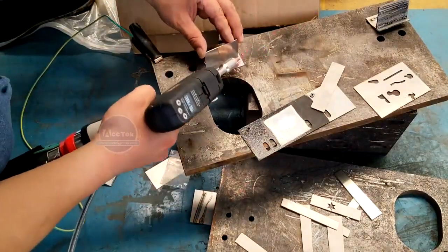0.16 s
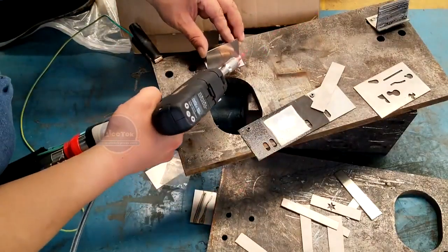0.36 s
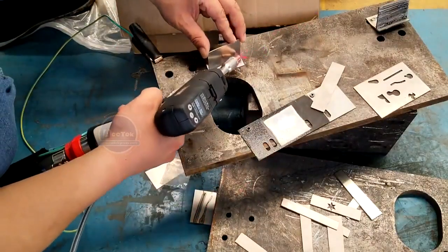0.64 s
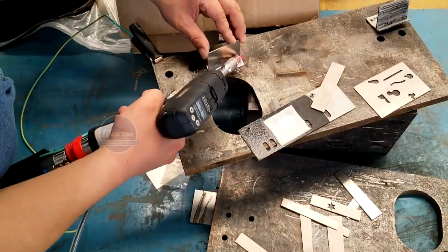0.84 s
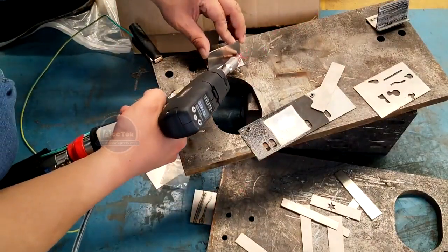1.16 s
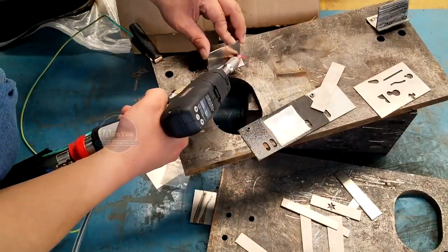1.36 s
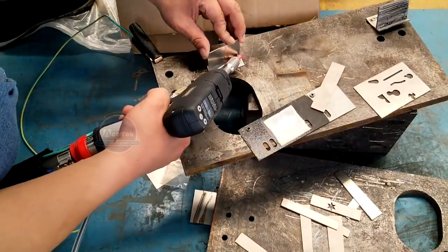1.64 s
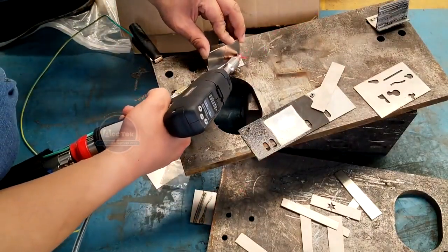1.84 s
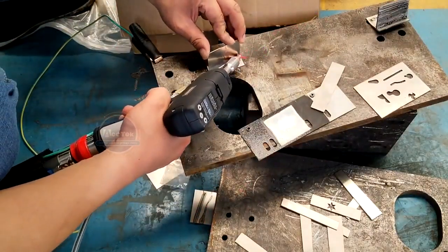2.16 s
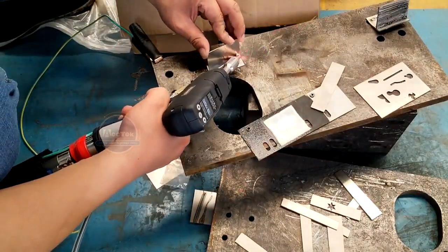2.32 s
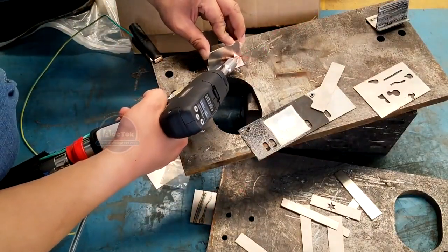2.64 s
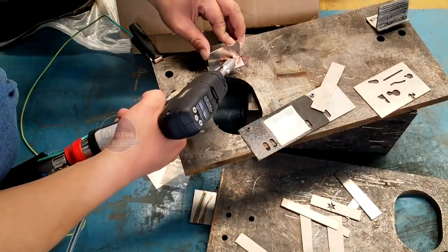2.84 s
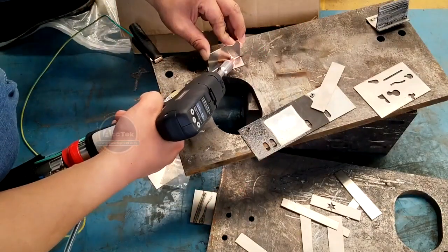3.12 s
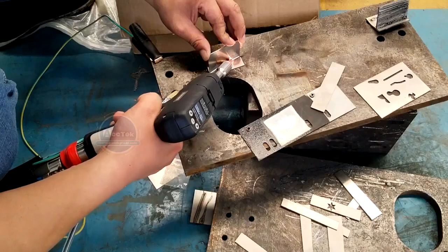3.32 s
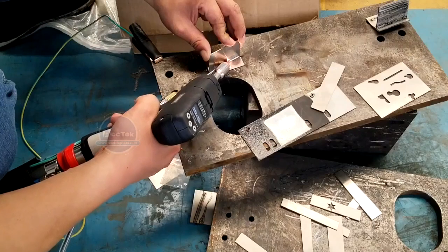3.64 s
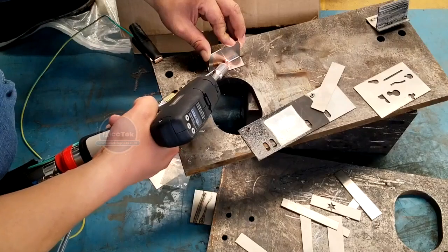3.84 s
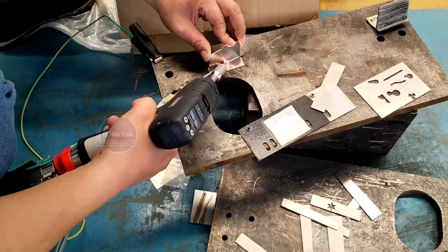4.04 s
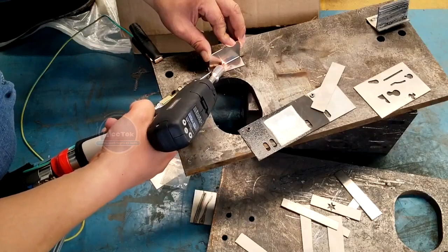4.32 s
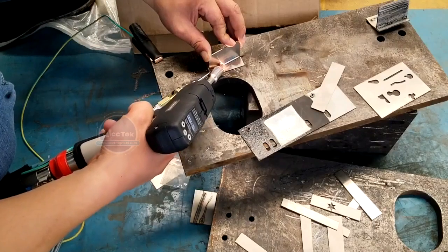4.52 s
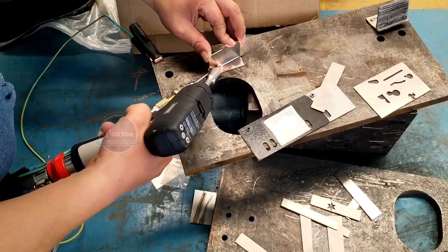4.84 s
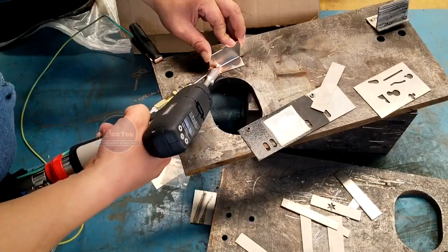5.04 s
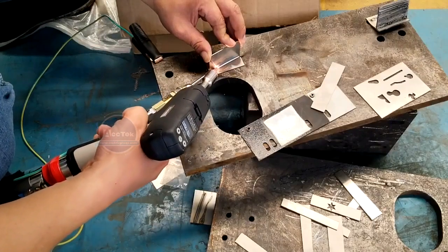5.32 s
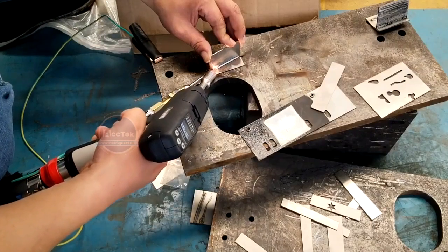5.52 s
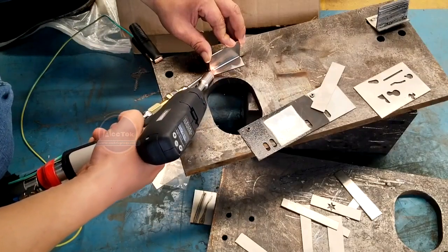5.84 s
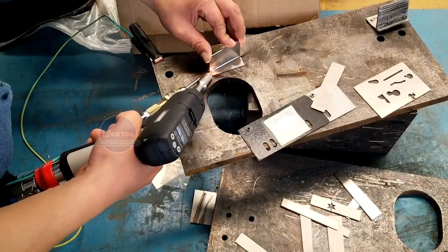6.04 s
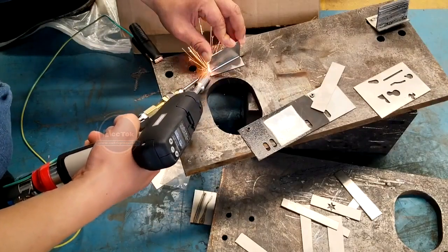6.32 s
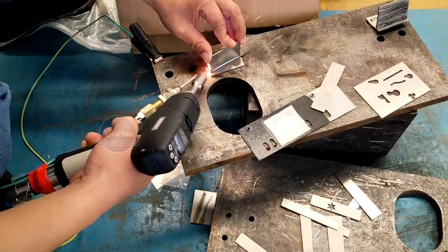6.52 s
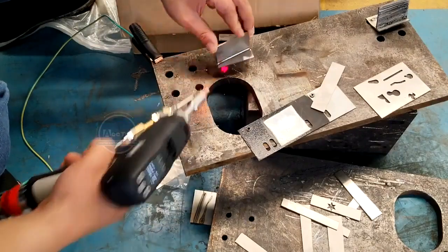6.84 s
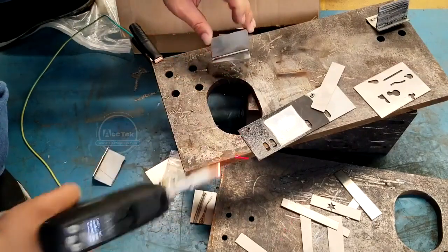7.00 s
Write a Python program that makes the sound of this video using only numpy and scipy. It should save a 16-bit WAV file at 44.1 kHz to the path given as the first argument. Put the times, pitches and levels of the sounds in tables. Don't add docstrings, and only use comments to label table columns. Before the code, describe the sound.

Quiet workshop with a humming, whining chiller, then a sharp valve snap and a loud, steady, whistling gas hiss from a handheld laser welder.

```python
import sys
import numpy as np
from scipy import signal
from scipy.fft import rfft, irfft, next_fast_len
from scipy.io import wavfile
from scipy.ndimage import uniform_filter1d, map_coordinates

SR = 44100
rng = np.random.default_rng(int(sys.argv[2]) if len(sys.argv) > 2 else 0)


def boost(x):
    u = np.asarray(x, float) / 20
    return 10 ** u


def transcribe(u):
    v = np.clip(np.atleast_2d(u).T, -1, 1)
    q = np.round(v * 32767).astype(np.int16)
    wavfile.write(sys.argv[1], SR, q)


N = 316152

# [f/Hz, density/dB per Hz]
RUMBLE = [(12, -28), (20, 3), (38, -2), (119, -2.5), (195, -3.5), (227, -7), (290, -11.5), (330, -13),
          (430, -38), (730, -120)]
# [f/Hz, density/dB per Hz]
AIR = [(180, -26), (300, -6), (715, -11), (1090, -16.5), (1140, -14), (1230, -19.5), (2050, -20.5),
       (3760, -27), (4120, -27), (4320, -29.5), (6070, -28), (12200, -46), (15900, -82), (22000, -120)]
# [f/Hz, level/dB]
CHILLER = [(47.5, -58), (99.7, -61), (149.3, -59), (199.9, -57), (300.5, -63), (399.2, -65), (490.2, -65),
           (1140, -71)]
# [f/Hz, level/dB]
DRIVE = [(1986, -68.5), (3418, -92), (3973, -67.5), (5098, -78), (5459, -86), (5938, -78.5), (6180, -80),
         (8096, -91)]
# [f/Hz, level/dB]
FAN = [(10401, -85)]
# [t/s, peak level/dB]
TICK = [
    (0.428, -62),
    (0.44, -63),
    (0.447, -63),
]
# [t/s, peak level/dB]
VALVE = [
    (2.1476, -23),
    (2.1488, -20),
    (2.1516, -31),
    (2.164, -40),
    (2.180, -41),
]
# [f/Hz, density/dB per Hz]
VALVE_COLOUR = [(880, -50), (1500, -21.5), (4670, -13.5), (5630, -15), (7020, -7), (9160, -18),
                (10800, 5.5), (12100, -9.5), (12500, -30), (16200, -57), (22000, -120)]
# [t/s, peak level/dB]
SPARKS = [
    (6.712, -46),
    (6.73, -46),
    (6.74, -43),
    (6.75, -45),
    (6.77, -48),
]
# [t/s, peak level/dB]
SNAPS = [
    (6.732, -23),
    (6.7365, -28),
    (6.738, -26),
    (6.7415, -26),
    (6.7428, -27),
]
# [f/Hz, level/dB]
SWING = [(599.3, -66), (1098.8, -68), (1498.3, -67), (1698.1, -68), (2297.5, -68), (2548, -67), (2997, -66),
         (3796, -64)]
# [t/s, level/dB]
MELT = [
    (2.3, -40),
    (2.6, 0),
    (6.6, 0),
    (6.9, -40),
]
# [f/Hz, width/Hz, level/dB]
FREE = [(7130, 150, -2), (8250, 500, -8), (9670, 100, 1), (11210, 160, -0.5), (11570, 200, -2)]
# [f/Hz, width/Hz, level/dB]
BORE = [(6626, 1060, -11.5), (6983, 420, -3.5), (7577, 493, 2), (8034, 545, -6)]
# [f/Hz, width/Hz, level/dB]
LIP = [(9150, 300, -6), (9420, 300, -5), (9710, 230, 0), (9980, 250, -5)]
# [f/Hz, width/Hz, level at seam's start/dB, level at its end/dB]
EDGE = [(10500, 530, -3.5, -1), (11020, 200, -19, 3), (10970, 260, -5.5, -13), (11380, 270, 2, -14),
        (11710, 640, -6, -3.5)]
# [f/Hz, width/Hz, level at seam's start/dB, level at its end/dB]
SHEET = [(1160, 550, -10.5, -7), (1337, 540, -10, -4.5), (1660, 610, -16, -11.5), (2030, 230, -9.5, -16.5),
         (2244, 106, -8, -6), (2530, 227, -6, 1.5), (2944, 280, -3, -9.5), (3244, 65, -1.5, -20),
         (3763, 600, 0, -2), (4236, 130, -2.5, 1.5), (4547, 102, 4, -2), (4890, 490, 3, -2),
         (5480, 210, 1.5, 1), (5743, 88, 4, 8)]
# [t/s, share/0-1]
TRAVEL = [
    (2.2, 0.17),
    (3.6, 0.01),
    (4.2, 0.25),
    (6, 1),
    (7.17, 0.82),
]
# [t/s, level/dB]
AIM = [
    (5.95, -0.5),
    (6.55, -4),
    (6.65, -5.5),
    (6.7, -4.5),
    (6.82, -8),
    (6.88, -5.5),
    (6.95, -9.5),
    (7.06, -5.5),
    (7.12, -3.5),
]
# [t/s, level/dB]
STANDOFF = [
    (2.5, -1.5),
    (3.3, 1.5),
    (3.75, -.5),
    (5, -0.5),
    (6.1, -2.5),
    (6.75, -2),
    (6.95, -5),
    (7.17, -10),
]
# [t/s, length/s]
GLIMPSES = [
    (3.15, .03),
    (3.62, .05),
    (3.76, 0.03994),
    (3.85, .05),
    (3.93, 0.034),
]
# [t/s, length/s, level/dB]
JERKS = [
    (2.37, 0.055, -2),
    (3.35, 0.064, -4),
    (6.65, .05, -7),
    (6.903, 0.055, 0),
    (7.1, 0.11, -10),
]
# [f/Hz, width/Hz, level at seam's start/dB, level at its end/dB]
NULLS = [(2105, 93, -3, -4.5), (2803, 75, -1.5, -6.5), (3114, 80, -0.5, -9.5), (3454, 79, -7.5, -7),
         (4125, 94, -5, -2), (4770, 82, 0, -11), (5200, 97, -8, -9), (6060, 98, -2, -10)]
# [t/s, delay/ms, share/0-1]
BENCH = [
    (6.2, 0.4, 0.08),
    (6.5, 0.5, 0),
    (6.75, 0.63, 0.04),
    (6.95, 1.13, 0.14),
    (7.17, 1.53, 0.2),
]
# [t/s, low f/Hz, high f/Hz, side level/dB]
SPLIT = [
    (3.522, 6900, 8350, -21),
    (4.381, 6450, 7700, -27),
    (5.04, 6500, 7590, -25),
]
# [f/Hz, level/dB]
BUDGET = [(1500, -28), (2200, -22), (3300, -19), (5000, -15), (6200, -14), (9000, -15), (12000, -16)]

TOP_HZ = 12050
OPEN_S, FILL_S = 2.16, 0.1
TILT_S = (2.55, 4.92)


def unit(x):
    return x / np.sqrt(np.mean(x ** 2) + 1e-20)


def curves(rows):
    s, *cols = np.transpose(rows)
    return [np.interp(np.arange(N) / SR, s, c) for c in cols]


def ramp(start, end):
    return np.clip((np.arange(N) / SR - start) / (end - start), 0, 1)


def spell(s, length):
    rise = ramp(s - length / 2 - 0.015, s - length / 2)
    fall = ramp(s + length / 2, s + length / 2 + 0.015)
    return rise - fall


def wobble(rate):
    coarse = np.arange(0, N + 64, 64)
    knots = rng.standard_normal(int(N * rate / SR) + 4)
    return np.interp(np.arange(N), coarse, map_coordinates(knots, [coarse * rate / SR]))


def filtered(x, response):
    m = next_fast_len(N + 8192)
    return irfft(rfft(x, m) * response(np.fft.rfftfreq(m, 1 / SR)), m)[:N]


def sloped(points):
    f, db = np.transpose(points)
    return lambda hz: boost(np.interp(np.log(hz + 1), np.log(f + 1), db))


def ringing(modes, steep):
    return lambda hz: np.sqrt(sum(boost(2 * db) / (1 + (2 * (hz - c) / w) ** 2) ** steep for c, w, db in modes))


def rush(response, patchy_db):
    z = signal.stft(rng.standard_normal(N), nperseg=1024)[2]
    field = uniform_filter1d(rng.standard_normal(z.shape), size=4, axis=0)
    field = uniform_filter1d(field, size=8, axis=1)
    patchy = signal.istft(z * boost(patchy_db * unit(field)), nperseg=1024)[1][:N]
    return unit(filtered(patchy, response))


def tones(lines, drift, flutter_db):
    t = np.arange(N) / SR
    return sum(np.sqrt(2) * boost(db + flutter_db * wobble(6)) * np.sin(2 * np.pi * hz * t + drift * wobble(8))
               for hz, db in lines)


def bursts(events, response, t60):
    out, t = np.zeros(N + SR), np.arange(SR // 10) / SR
    noise = unit(filtered(rng.standard_normal(N), response))
    for s, db in events:
        attack = 1 - np.exp(-t / 0.00043)
        out[round(s * SR):][:len(t)] += boost(db + 3 - 60 * t / t60) * attack
    return out[:N] * noise


def seam_share():
    return np.clip(curves(TRAVEL)[0], 0, 1)


def travelling(modes, steep, patchy_db):
    along = seam_share()
    start = rush(ringing([(c, w, db) for c, w, db, _ in modes], steep), patchy_db)
    end = rush(ringing([(c, w, db) for c, w, _, db in modes], steep), patchy_db)
    return np.sqrt(1 - along) * start + np.sqrt(along) * end


def layer_db(db, power, tilt_db, late, aim_share):
    pressure = 1 - np.exp(-np.clip(np.arange(N) / SR - OPEN_S, 1e-4, None) / FILL_S)
    return db + power * 20 * np.log10(pressure) + tilt_db * ramp(*TILT_S) ** late + aim_share * curves(AIM)[0]


def whistle_db():
    return layer_db(-18.5, power=3.1, tilt_db=-3.5, late=4.5, aim_share=1.37)


def shop():
    knee_db, lag_s = -45.5, 0.41
    lag = np.exp(-1 / (lag_s * SR))
    over_db = signal.lfilter([1 - lag], [1, -lag], np.clip(whistle_db() - knee_db, 0, None))
    swing_ms = curves(BENCH)[0] - BENCH[0][1]
    rumble_db = -0.2 * over_db
    air_db = 3.5 * swing_ms - 0.085 * over_db
    drive_db = 1.5 - 7.5 * np.exp(-np.arange(N) / SR / 0.35)
    fan_stop_s = 1.1497
    fan_db = 1 - 20 * ramp(fan_stop_s - 0.05, fan_stop_s + 0.05)
    rumble = boost(-48 + rumble_db + 0.59 * wobble(12)) * rush(sloped(RUMBLE), patchy_db=1.1)
    air = boost(-51 + air_db + 1.5 + 0.9 * wobble(10)) * rush(sloped(AIR), patchy_db=1.9)
    hum = tones(CHILLER, drift=0.5, flutter_db=1.0)
    drive = boost(drive_db) * tones(DRIVE, drift=0.47, flutter_db=1.5)
    fan = boost(fan_db) * tones(FAN, drift=3, flutter_db=0)
    return rumble + air + boost(1.03 * rumble_db) * hum + boost(air_db - 1.5) * (drive + fan)


def tick():
    return bursts(TICK, ringing([(8700, 4500, 0)], steep=2.2), t60=0.042)


def valve():
    snap = bursts(VALVE, sloped(VALVE_COLOUR), t60=0.0057)
    room = bursts(VALVE, sloped(VALVE_COLOUR), t60=0.1)
    return snap + boost(-18.0) * room


def sparks():
    spits = bursts(SPARKS, ringing([(1490, 2500, 0)], steep=1.8), t60=0.069)
    snaps = bursts(SNAPS, ringing([(1800, 2600, 0)], steep=1.7), t60=0.0053)
    return spits + snaps


def melt():
    return boost(curves(MELT)[0]) * tones(SWING, drift=0.19, flutter_db=4)


def free_jet():
    level = ramp(5.8, 6.37) * boost(-35 + 3.2 * wobble(16))
    return level * rush(ringing(FREE, steep=1.6), patchy_db=3.5)


def shade_db():
    start, end, shadow_db = 3.08, 4.0, -19
    hidden = ramp(start, start + 0.03) - ramp(end - 0.08, end)
    seen = 0.83 * sum(spell(s, length) for s, length in GLIMPSES)
    return shadow_db * np.clip(hidden - seen, 0, 1)


def jet():
    eddies = 0.28 * wobble(16) + 1.0 * wobble(32)
    jerks_db = sum(db * spell(s, length) for s, length, db in JERKS)
    bore_db = whistle_db() + 0.56 * eddies
    lip_db = layer_db(-37.5, power=3, tilt_db=5.5, late=3.5, aim_share=1.05)
    lip_db = lip_db + shade_db() + 0.83 * jerks_db + 0.86 * eddies
    edge_db = layer_db(-44.5, power=1.5, tilt_db=12, late=0.6, aim_share=0.33) + 0.45 * eddies + jerks_db
    roar_db = layer_db(-35, power=3, tilt_db=-1, late=2.5, aim_share=0.45)
    roar_db = roar_db + curves(STANDOFF)[0] + 0.24 * eddies + 0.65 * wobble(11)
    whistle = boost(bore_db) * rush(ringing(BORE, steep=1.566), patchy_db=1.1)
    lip = boost(lip_db) * rush(ringing(LIP, steep=1.27), patchy_db=1.0)
    edge = boost(edge_db) * travelling(EDGE, steep=1.77, patchy_db=1.5)
    roar = boost(roar_db) * travelling(SHEET, steep=1.35, patchy_db=2.5)
    return whistle + lip + edge + roar


def nulled(x):
    def dips(rows):
        return lambda hz: boost(sum(db / (1 + (2 * (hz - c) / w) ** 2) for c, w, db in rows))

    start = filtered(x, dips([(c, w, db) for c, w, db, _ in NULLS]))
    end = filtered(x, dips([(c, w, db) for c, w, _, db in NULLS]))
    return start + seam_share() * (end - start)


def bench(x):
    delay_ms, share = curves(BENCH)
    share = np.clip(share, 0, 0.95)
    echo = map_coordinates(x, [np.arange(N) - delay_ms * SR / 1000], order=3)
    return (x + share * echo) / np.sqrt(1 + share ** 2)


def scene():
    background = shop() + tick()
    welder = valve() + sparks() + melt() + free_jet() + bench(nulled(jet()))
    return np.tile(background + welder, (2, 1))


def thinned(x, budget, mask_db, up_db, down_db):
    hz, _, z = signal.stft(x, SR, nperseg=2048, window="cosine")
    narrow, wide = (abs(uniform_filter1d(abs(z) ** 2, size=k, axis=0)) for k in (5, 14))
    power = np.where(hz[:, None] > 9000, wide, narrow)
    ear = 26.8 * hz / (1960 + hz) + 3 * (hz / 10000) ** 2
    apart = ear[:, None] - ear
    spread = boost(-2 * np.where(apart > 0, up_db * apart, -down_db * apart))
    masked = boost(2 * mask_db) * (spread @ power) / spread.sum(axis=1)[:, None]
    treble = power[(hz > 2000) & (hz < TOP_HZ)].mean(axis=0)
    starved = sloped(budget)(hz)[:, None] ** 2 * treble
    margin_db = 10 * np.log10(power / (masked + starved + 1e-20) + 1e-12)
    keep = 1 / (1 + np.exp(np.clip(-margin_db / 0.23, -30, 30)))
    kept = z * np.where(hz[:, None] > 1500, keep, 1)
    return signal.istft(kept, SR, nperseg=2048, window="cosine")[1][:N]


def split():
    t, side = np.arange(N) / SR, np.zeros(N)
    for s, lo, hi, db in SPLIT:
        window = np.cos(np.pi * np.clip((t - s) / 0.046, -0.5, 0.5)) ** 2
        band = unit(filtered(rng.standard_normal(N), lambda hz: (hz > lo) & (hz < hi)))
        side += boost(db) * window * band
    return side


def band_limit(x):
    return signal.sosfilt(signal.butter(12, 13030, fs=SR, output="sos"), x)


def record(dry):
    limited = filtered(dry[0], lambda hz: hz < TOP_HZ)
    x = thinned(limited, BUDGET, mask_db=-8.5, up_db=5.5, down_db=7.5)
    side = split()
    return band_limit(np.array([x + side, x - side]))


dry = scene()
out = record(dry)
transcribe(out)
```